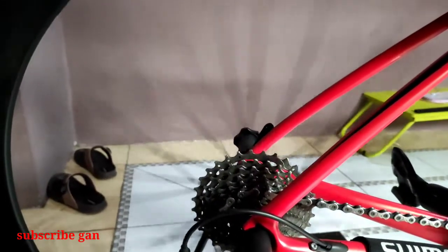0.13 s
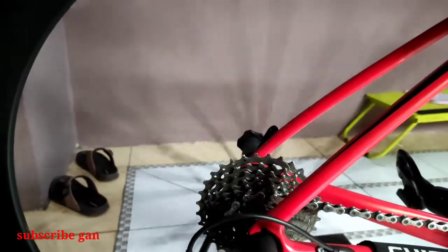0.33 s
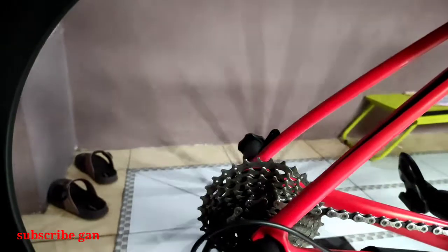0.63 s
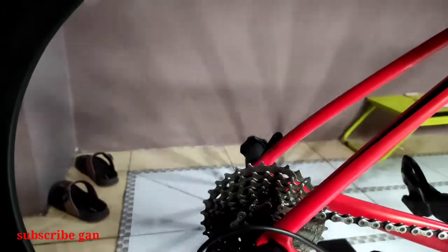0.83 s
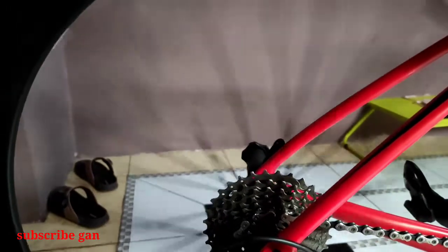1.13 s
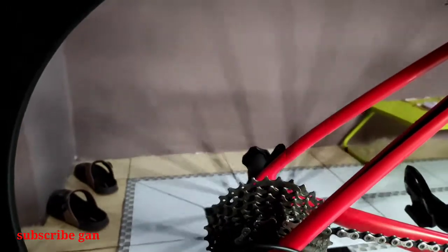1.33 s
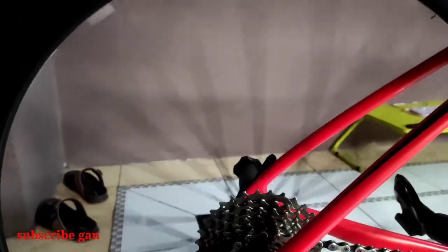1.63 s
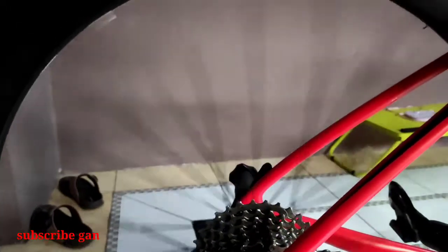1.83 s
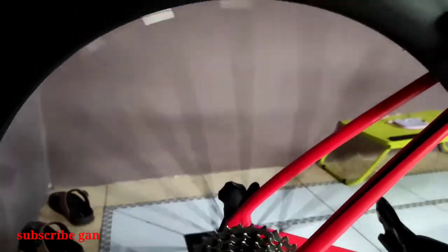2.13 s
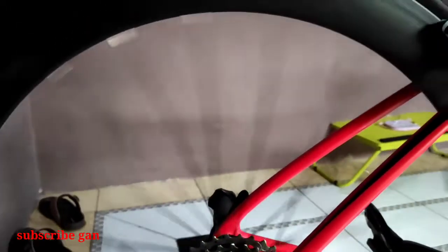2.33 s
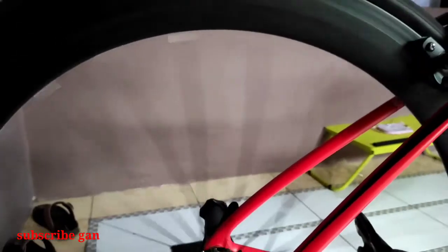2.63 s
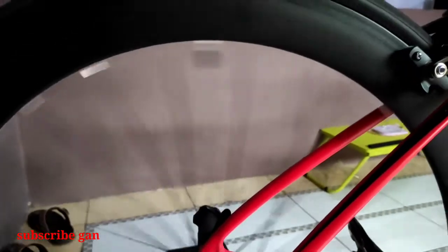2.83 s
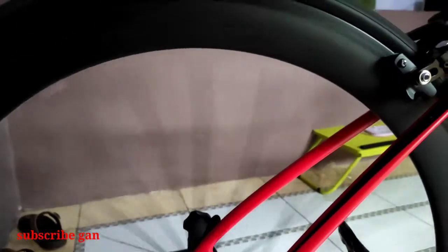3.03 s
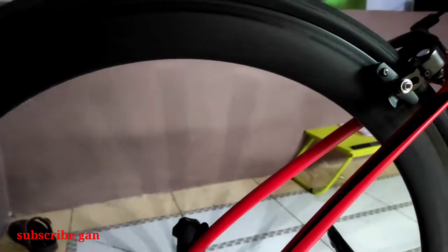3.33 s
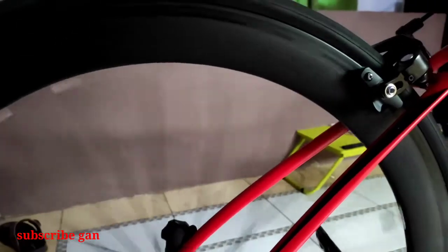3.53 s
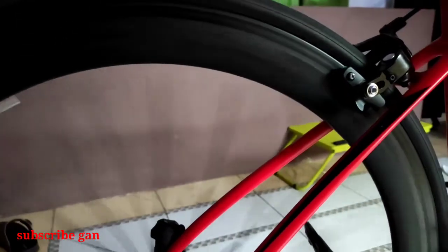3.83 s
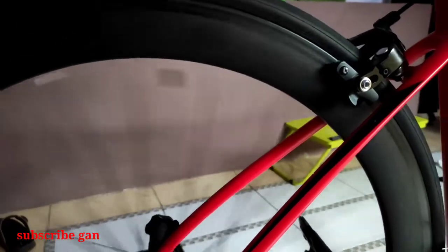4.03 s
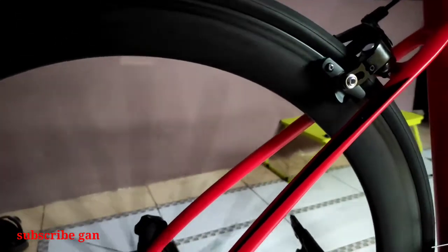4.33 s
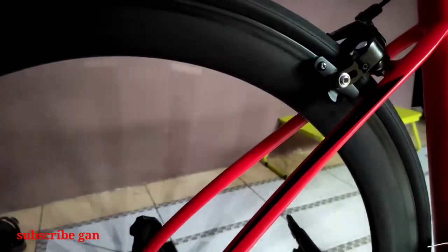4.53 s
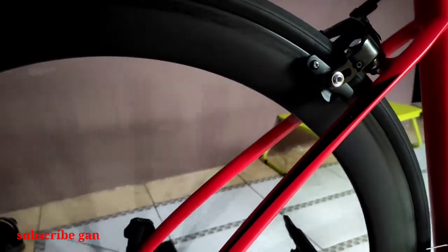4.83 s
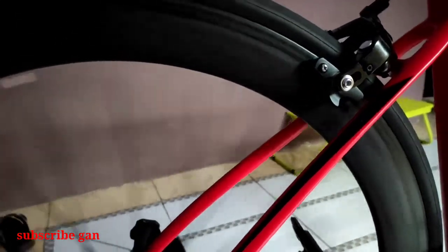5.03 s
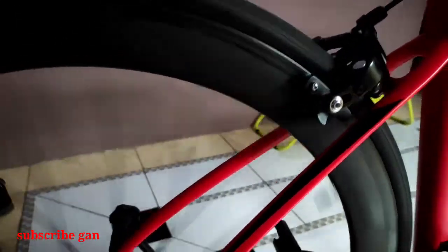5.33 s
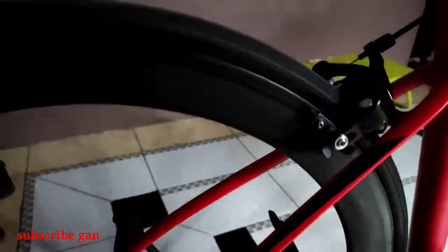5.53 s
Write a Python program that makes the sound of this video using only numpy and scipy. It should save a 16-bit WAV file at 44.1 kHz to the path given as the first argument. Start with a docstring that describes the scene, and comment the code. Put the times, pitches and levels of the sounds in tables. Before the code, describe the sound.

Close, rapid steel ratcheting from a freewheeling bicycle hub rattles on without pause, with faint engine drone and street murmur outside.

```python
"""A bicycle's rear wheel coasts in a small tiled room, slowly losing speed.
All along, the freehub's pawls snap over 24 teeth a turn and ring hub, sprockets, rim and spokes; walls answer.
Two microphones close to the wheel hear different sides of the hub and move between hub and rim.
Outdoors an engine drones faintly over a dull street murmur: its pitch sinks, then jumps up after 3.4 s.
Near 4.9 s a thin, faint tone swells and fades far off."""
import sys
import numpy as np
from scipy import signal
from scipy.fft import rfft, irfft
from scipy.io import wavfile
from scipy.ndimage import uniform_filter1d, map_coordinates

SR = 44100
rng = np.random.default_rng(int(sys.argv[2]) if len(sys.argv) > 2 else 0)


def master(y):
    """Save y as 16-bit WAV."""
    cut = np.clip(np.atleast_2d(y).T, -1, 1)
    pcm = np.round(cut * 32767)  # scale
    wavfile.write(sys.argv[1], SR, pcm.astype(np.int16))


N = 250091  # length in samples

TEETH, SNAPS = 24, 231  # teeth a turn, snaps in all
SCATTER_T60_S, SCATTER_DB = .063, 1.4  # cloud of echoes off wheel, frame and floor
CUTOFF_HZ = 15550  # top of the sound

# Contacts at each tooth: two slips off its edge, three pawls and three dying rebounds.
# Each row: lag in s, sway once a turn in s, relative strength in dB.
PAWLS = [(-.002, 0.00044, -18), (-.0006, 0.00015, -8.5), (0, 0.00046, -8), (.0006, 0.00035, -8.5),
         (.0013, 0.00011, -12.5), (.0023, 0.000069, -11), (.0052, 0.00044, -10.5), (.0082, 0.00017, -21)]


def freehub(colour_db):
    """The pawls ring the hub, and through it the rim and spokes; returns that ringing and the dry crack."""
    # The microphones move between hub and rim. Each row: time in s, place (-1 hub, 0 halfway, 1 rim,
    # and beyond), level of hub and crack in dB.
    microphone_path = [(0, -4, 1.66), (1.2, 1, 0), (1.85, -1.2, 0.8), (3.1, 2, 0.1), (4.35, 0, 0.95),
                       (4.7, 1.3, 0.5), (5.67, 0, 1.5)]
    crack_db = -33.5  # before the level along the path
    at, strength, angle = pawl_contacts(jitter_s=.00015, tooth_jitter_s=.00016, rebound_jitter=.14, uneven_db=.3)
    scatter = scatter_envelope(at, strength)
    starts = at.min(axis=1)
    place, level_db = in_time(microphone_path)
    hub = sprockets(at, strength, vary_db=2) + hub_shell(at, strength, scatter, starts, place, colour_db)
    wheel = rim_and_spokes(at, strength, scatter, starts, place, angle)
    crack = dry_crack(at, strength, starts, colour_db=2, count=10)
    return hub * from_db(level_db) + wheel, crack * from_db(crack_db + level_db)


def pawl_contacts(jitter_s, tooth_jitter_s, rebound_jitter, uneven_db):
    """Sample and strength of each contact (snaps x contacts), and the wheel's angle in turns at every sample."""
    # The coasting wheel. Each row: turns made, time in s.
    coasting = [(0, .0072), (2.5, 1.4366), (5, 2.8986), (7.5, 4.395), (9.5, 5.6183)]
    # Snaps that stand out of the buzz, hard, crisp or slack. Each row: time in s, force in dB against
    # the usual snap, lags as a share of the usual ones.
    accents = [(0.0316, -1.8, 1.0), (0.196, 1.7, 1.1), (0.2199, 3.5, 0.45), (0.3853, -1.8, 1.1),
               (0.4807, 1.8, 1.1), (0.5046, 1.6, 1.1), (0.6475, 1.4, 0.45), (0.6945, -1.8, 1.1),
               (0.7418, -3.7, 1.1), (0.8852, -2.3, 1.1), (0.9092, 2.8, 0.45), (1.029, 1.4, 0.7),
               (1.0773, 2.7, 0.45), (1.101, 3.9, 0.45), (1.1489, 1.3, 0.45), (1.1971, 2.7, 0.45),
               (1.2209, 2.8, 0.45), (1.3168, -3.7, 1.1), (1.3883, 2.0, 0.45), (1.4368, 2.7, 0.45),
               (1.5334, -2.9, 1.1), (1.5574, -3.1, 1.0), (1.582, -2.0, 1.1), (1.6545, 2.6, 0.6),
               (1.6788, 2.3, 0.5), (1.7273, 2.5, 0.4), (1.7515, 1.3, 0.4), (1.8241, -3.6, 0.9),
               (1.8481, -2.3, 1.1), (1.8717, -1.7, 1.1), (1.8961, -2.5, 1.1), (1.9452, 1.2, 0.5),
               (1.9694, 1.9, 0.8), (2.0177, 1.3, 0.45), (2.0661, 1.9, 0.45), (2.1152, -1.9, 1.1),
               (2.1884, 1.4, 1.0), (2.2618, 2.1, 0.45), (2.6285, 1.8, 0.45), (2.8501, 0.5, 0.45),
               (2.9979, -2.8, 1.1), (3.0227, -0.1, 0.4), (3.047, -2.7, 0.7), (3.1953, 1.8, 0.45),
               (3.2942, -2.5, 1.1), (3.3689, 1.5, 1.1), (3.4191, 3.3, 0.45), (3.4442, 2.5, 0.6),
               (3.4936, -1.7, 0.9), (3.6182, 0.9, 0.4), (3.6676, -0.4, 0.45), (3.8424, 1.6, 0.45),
               (4.0183, 1.9, 0.45), (4.1939, -2.7, 0.7), (4.6236, 1.8, 1.0), (4.649, 2.9, 0.45),
               (4.6995, 1.8, 1.1), (4.75, 2.0, 0.8), (5.0294, 1.4, 0.9), (5.2346, 2.4, 0.45),
               (5.5155, -1.9, 1.1), (5.5926, -2.2, 1.1)]
    turns = np.arange(SNAPS) / TEETH
    # a smooth polynomial through the rows gives the time of every tooth
    tooth_s = np.polyval(np.polyfit(*np.transpose(coasting), len(coasting) - 1), turns)
    lag, sway, strength_db = np.transpose(PAWLS)
    force_db = snap_force(turns) + uneven_db * rng.standard_normal(SNAPS)
    spread = np.ones(SNAPS)
    # the ratchet ring runs slightly off centre, so the pawls bunch and spread once a turn
    off_centre_s = sway * np.cos(2 * np.pi * turns)[:, None]
    drop_s = tooth_s[:, None] + off_centre_s + tooth_jitter_s * rng.standard_normal((SNAPS, 1))
    for accent_s, accent_db, share in accents:
        tooth = np.argmin(abs(tooth_s - accent_s))
        drop_s[tooth], force_db[tooth], spread[tooth] = accent_s, accent_db, share
    lags = lag * spread[:, None] * (1 + rebound_jitter * rng.standard_normal((SNAPS, len(lag))))
    contact_s = drop_s + lags + jitter_s * rng.standard_normal(lags.shape)
    at = np.clip(contact_s * SR, 0, N - 1).astype(int)
    strength = from_db(strength_db + force_db[:, None])
    return at, strength, np.interp(np.arange(N) / SR, tooth_s, turns)


def snap_force(turns):
    """Force of the snaps in dB: swells tied to the wheel's angle, settling turn by turn."""
    # Ratchet and bearings run out of true, so the snaps swell and ease as the wheel turns.
    # Each row: swells a turn, relative depth, wheel angle of a swell in turns.
    swells = [(1, 1.2, 0.8), (2, 0.44, 0.4), (2.36, 1, 0.48), (4, 2.2, 0.072), (6, 0.85, 0.029),
              (9, 2.5, 0.025)]
    start_db, settle_turns = .34, 10  # dB for a relative depth of 1 at the start, turns to 1/e
    swell = sum(depth * np.cos(2 * np.pi * per_turn * (turns - facing)) for per_turn, depth, facing in swells)
    return start_db * np.exp(-turns / settle_turns) * swell


def hub_shell(at, strength, scatter, starts, place, colour_db):
    """Steel modes of hub shell and cassette ring at every contact, shifting from snap to snap."""
    # Each row: middle in Hz, width of each of two resonances in Hz, left and right rms level in dB
    # before the level along the microphones' path.
    hub_modes = [(2167, 400, -54, -50), (2840, 480, -40, -40), (3400, 510, -45, -49.5),
                 (4017, 650, -37, -36), (5450, 390, -50.5, -45.5), (7220, 1400, -36.5, -34.5),
                 (7790, 570, -29.5, -25), (8705, 550, -25, -29), (9350, 760, -30.5, -39.5),
                 (10700, 1600, -46.5, -48.5), (12430, 610, -35.5, -35.5), (14300, 770, -41.5, -40),
                 (15500, 410, -51, -50)]
    wander = .27  # rms shift of a mode, about this share of its width
    out = 0
    for hz, width_hz, left_db, right_db in hub_modes:
        # no two teeth are struck alike, so the pitch and mix of the modes change
        snap_hz = hz + wander * width_hz * np.sqrt(3) * rng.uniform(-1.075, 1, SNAPS)
        driven = strikes(at, strength, scatter, vary_db=2.5)
        ring = sprung(resonate(driven, snap_hz, width_hz, starts), starts, strength)
        mix_db = colour_db * tooth_to_tooth(starts) + place * near_rim_db(hz)
        out = out + from_db([[left_db], [right_db]]) * rms_one(ring * from_db(mix_db))
    return out


def sprockets(at, strength, vary_db):
    """Short metallic pings: the hardest contact of each snap rings the cassette, at new pitches every time."""
    # Clusters of close modes; each snap rings one in each cluster at each microphone. Each row: middle
    # in Hz, half range in Hz, left and right rms level in dB before the level along the path.
    clusters = [(2844, 311, -44.5, -49.5), (4042, 272, -44, -42), (7680, 427, -45, -37.5),
                (8750, 455, -33, -45.5), (12530, 530, -52.5, -49)]
    t60_s = .035
    t = np.arange(SR // 12) / SR
    hardest = np.argmax(np.array(PAWLS)[:, 2])
    fade = from_db(-60 * t / t60_s)
    out = 0
    for hz, range_hz, left_db, right_db in clusters:
        pitches = hz + range_hz * (2 * rng.random((SNAPS, 2, 1)) - 1)
        sizes = strength[:, hardest, None, None] * from_db(vary_db * rng.standard_normal((SNAPS, 2, 1)))
        pings = np.zeros((2, N + len(t)))
        for start, pitch, size in zip(at[:, hardest], pitches, sizes):
            pings[:, start:start + len(t)] += size * fade * np.sin(2 * np.pi * pitch * t)
        out = out + from_db([[left_db], [right_db]]) * rms_one(pings[:, :N])
    return out


def rim_and_spokes(at, strength, scatter, starts, place, angle):
    """Lower modes of rim and spokes sing along, swelling and easing once a turn."""
    # Each row: middle in Hz, width of each of two resonances in Hz, level in dB before swell and place,
    # swell once a turn in dB (a dip where negative), wheel angle of the swell in turns.
    wheel_modes = [(760, 180, -69, 10.5, 0.72), (912, 180, -53.5, -0.5, 0.2), (1051, 50, -65, 5, 0.79),
                   (1203, 460, -61, -3, 0.42), (1523, 58, -63, 11, 0.3), (1667, 190, -59.5, 0.5, 0.44),
                   (1975, 91, -56, 4, 0.1)]
    out = 0
    for hz, width_hz, mode_db, swell_db, facing in wheel_modes:
        driven = strikes(at, strength, scatter, vary_db=1)
        ring = sprung(resonate(driven, np.full(SNAPS, hz), width_hz, starts), starts, strength)
        # each mode's lobes turn with the wheel and sweep past the microphones
        lobe_db = swell_db * np.cos(2 * np.pi * (angle - facing))
        out = out + from_db(mode_db + lobe_db + place * near_rim_db(hz)) * rms_one(ring)
    return out


def dry_crack(at, strength, starts, colour_db, count):
    """Steel on steel: noise bursts and echoes in `count` bands whose strengths differ by tooth; rms 1."""
    # Each row: frequency in Hz, relative density in dB per Hz.
    crack_spectrum = [(700, -49), (2000, 7), (3300, 1), (5000, 5.5), (6100, -10), (11000, 5.5),
                      (15500, -2.5)]
    t60_s, echo_db = .012, -1
    echo_energy = from_db(echo_db) ** 2 * trail(at, strength, SCATTER_T60_S)
    burst = np.sqrt(trail(at, strength, t60_s) + echo_energy)
    edges = np.linspace(crack_spectrum[0][0], CUTOFF_HZ, count + 1)
    out = 0
    for band in zip(edges, edges[1:]):
        noise = burst * from_db(colour_db * tooth_to_tooth(starts)) * rng.standard_normal((2, N))
        out = out + signal.sosfilt(signal.butter(2, band, "band", fs=SR, output="sos"), noise)
    return rms_one(coloured(out, crack_spectrum))


def scatter_envelope(at, strength):
    """Each snap trails off in the pawl's brief chatter and a longer cloud of echoes."""
    chatter_t60_s, chatter_db = .0093, 5.5
    chatter = from_db(chatter_db) ** 2 * trail(at, strength, chatter_t60_s)
    cloud = from_db(SCATTER_DB) ** 2 * trail(at, strength, SCATTER_T60_S)
    return np.sqrt(chatter + cloud)


def strikes(at, strength, scatter, vary_db):
    """What drives one mode at each microphone: every contact with a strength of its own, and its echoes."""
    echoes_per_s = 2000
    sizes = strength * from_db(vary_db * rng.standard_normal((2,) + at.shape))
    clicks = np.array([np.bincount(at.ravel(), side.ravel(), N) for side in sizes])
    echoes = rms_one((rng.random((2, N)) < echoes_per_s / SR) * rng.choice([-1, 1], (2, N)))
    return clicks + scatter * echoes


def resonate(x, snap_hz, width_hz, starts):
    """Two like resonances in a row, tuned anew at each snap: the ring swells briefly, then dies."""
    r = np.exp(-np.pi * width_hz / SR)
    g = (1 - r * r) / 2
    zeros = [g * g, 0, -2 * g * g, 0, g * g]
    state, out = np.zeros((2, 4)), []
    for hz, piece in zip(snap_hz, np.split(x + 1e-18, starts[1:], axis=1)):
        poles = [1, -2 * r * np.cos(2 * np.pi * hz / SR), r * r]
        # the state carries the old ring over into the new tuning
        ring, state = signal.lfilter(zeros, np.convolve(poles, poles), piece, zi=state)
        out.append(ring)
    return np.concatenate(out, axis=1)


def sprung(x, starts, strength):
    """However its contacts add up, a snap gives off about the energy that the springs held."""
    excess = np.add.reduceat((x ** 2).sum(axis=0), starts) / (strength ** 2).sum(axis=1)
    return x * by_snap(np.clip(excess / excess.mean(), .3, 3) ** -.5, starts)


def trail(at, strength, t60):
    """The energy of the contacts, spread over a dying tail."""
    keep = from_db(-60 / (t60 * SR)) ** 2
    energy = np.bincount(at.ravel(), strength.ravel() ** 2, N)
    return signal.lfilter([0, 1 - keep], [1, -keep], energy + 1e-18)


def tooth_to_tooth(starts):
    """Bounded chance of spread 1 for each snap; a strong one tends to follow a weak one."""
    return by_snap(np.diff(rng.random(SNAPS + 1)) * np.sqrt(6), starts)


def by_snap(values, starts):
    """Hold one value for the length of each snap, with soft steps."""
    return uniform_filter1d(np.repeat(values, np.diff(np.r_[0, starts[1:], N])), size=32)


def near_rim_db(hz):
    """How much a mode gains at each microphone on the way to the rim, in dB per unit of place."""
    # Change from halfway to the rim. Each row: frequency in Hz, left and right gain in dB.
    rim_gain = [(750, -5, -1), (1090, 2, 2), (1460, 1, 0), (2270, 4, 2.5), (2760, 2.5, -0.6),
                (4000, 0, -0.5), (8300, 0.5, 0)]
    return np.array([[at_hz(np.array(rim_gain)[:, [0, side]], hz)] for side in (1, 2)])


def room(x, build_s, count):
    """Hard walls return a diffuse tail; it changes as the hand-held microphones pass `count` places."""
    # The room's ring against the sound that feeds it. Each row: frequency in Hz, gain in dB.
    room_colour = [(700, 2), (2000, 3.5), (4000, 0.5), (6000, -2), (8500, -5), (15000, -7)]
    t60_s = .3
    t = np.arange(SR // 3) / SR
    shape = from_db(-60 * t / t60_s) * (1 - np.exp(-t / build_s))
    out = np.zeros((2, N + len(t)))
    path = np.linspace(0, count - 1, N)
    for place in range(count):
        near = np.flatnonzero(abs(path - place) < 1)
        crossfade = np.sqrt(1 - abs(path[near] - place))
        diffuse = rms_one(rng.standard_normal((2, len(t))) * shape) / np.sqrt(len(t))
        wet = signal.fftconvolve(x[:, near] * crossfade, coloured(diffuse, room_colour), axes=1)
        out[:, near[0]:near[0] + wet.shape[1]] += wet
    return out[:, :N]


def engine(waver, flutter_db):
    """Only the lowest harmonics of the firing come through the walls, with the rush of the exhaust."""
    # It runs down, then picks up again. Each row: time in s, firing rate in Hz, levels of the second,
    # third and fourth harmonic in dB before flutter and the lean to the left.
    firing = [(0, 80.7, -64, -48, -82), (.2, 81.4, -49, -56, -56), (.5, 78.3, -47, -67, -68),
              (.58, 79.8, -59, -62, -68), (.67, 76.7, -46.5, -48, -68), (.78, 77.8, -60, -68, -51),
              (.88, 77.3, -54, -49, -60), (1, 76.6, -59, -46.5, -73), (1.12, 76.2, -49.5, -43.5, -68),
              (1.25, 76.2, -55.5, -63.5, -72), (1.6, 74.2, -54, -55, -68), (1.75, 72.2, -66, -61, -58),
              (2, 71.1, -68, -64, -72), (2.33, 68.4, -67, -56, -68), (2.55, 66.9, -60, -66, -58),
              (2.72, 65.1, -61, -67, -70), (2.85, 64.25, -65, -65, -57), (3.2, 62.7, -73, -70, -60),
              (3.4, 62.2, -73, -78, -72), (3.6, 78, -70, -76, -73), (4, 77.8, -85, -95, -83),
              (4.2, 78.4, -58, -82, -65), (4.55, 79.4, -52.5, -82, -65), (4.8, 78.1, -65, -77, -85),
              (5.67, 78, -66, -67, -74)]
    # Exhaust noise. Each row: frequency in Hz, relative density in dB per Hz.
    exhaust_spectrum = [(100, -10), (180, -12), (280, -1.5), (370, -3), (480, -22), (650, -21), (1000, -11)]
    # Each row: time in s, exhaust level in dB before the lean to the left.
    exhaust_level = [(0, -38), (1.2, -41.5), (2.2, -45), (2.9, -41), (3.5, -85), (5.67, -65)]
    first_db = -14  # the firing rate itself against its second harmonic
    hz, *harmonics_db = in_time(firing)
    phase = 2 * np.pi * np.cumsum(hz * (1 + waver * drift(24))) / SR
    drone = 0
    for k, db in enumerate([harmonics_db[0] + first_db] + harmonics_db, 1):
        drone = drone + from_db(db + flutter_db * drift(12)) * np.sqrt(2) * np.sin(k * phase)
    return drone + from_db(in_time(exhaust_level)[0]) * outdoor_noise(exhaust_spectrum)


def whine(waver):
    """A thin tone far off, a wavering sine, swells and fades."""
    middle_s, half_s, hz = 4.86, .19, 723  # half_s: from the middle to 1/e
    peak_db = -60  # before the lean to the left
    swell = np.exp(-((np.arange(N) / SR - middle_s) / half_s) ** 2)
    phase = 2 * np.pi * np.cumsum(hz * (1 + waver * drift(25))) / SR
    return from_db(peak_db) * swell * np.sqrt(2) * np.sin(phase)


def street():
    """Steady murmur of the street: dull noise, strongest in the bass."""
    # Each row: frequency in Hz, relative density in dB per Hz.
    street_spectrum = [(12, -12), (28, 0.5), (50, -4), (65, -4), (85, 0.9), (113, -8), (160, -3), (260, -4),
                       (450, -11), (700, -12), (1200, -30)]
    return from_db(-54.5) * outdoor_noise(street_spectrum)  # dB before the lean to the left


def outdoor_noise(spectrum):
    """Coloured noise of rms 1, alike on both sides but for a looser stretch around 300 Hz."""
    # Likeness of the sides. Each row: frequency in Hz, correlation from 0 to 1.
    likeness = [(30, 1), (150, 1), (300, 0.65), (700, 1)]
    mid, side = rfft(coloured(rng.standard_normal((2, N)), spectrum))
    alike = np.clip(at_hz(likeness, np.fft.rfftfreq(N, 1 / SR)), 0, 1)
    return rms_one(irfft(np.sqrt(1 + alike) * mid + np.sqrt(1 - alike) * side * [[1], [-1]], N))


def from_db(db):
    """Decibels to gain."""
    return 10 ** (np.asarray(db) / 20)


def rms_one(x):
    """Scale each channel to an rms of 1."""
    return x / np.sqrt(np.mean(x ** 2, axis=-1, keepdims=True) + 1e-20)


def in_time(rows):
    """The columns of a curve at every sample."""
    s, *columns = np.transpose(rows)
    return [np.interp(np.arange(N) / SR, s, c) for c in columns]


def at_hz(points, hz):
    """Read a spectrum on a log-frequency axis."""
    f, value = np.transpose(points)
    return np.interp(np.log(hz + 1), np.log(f), value)


def coloured(x, spectrum):
    """Filter a sound by a smooth spectrum in dB."""
    size = x.shape[-1]
    gain = from_db(at_hz(spectrum, np.fft.rfftfreq(size, 1 / SR)))
    return irfft(rfft(x) * gain, size)


def drift(rate):
    """Slow chance of spread about 1, with `rate` new values a second."""
    values = rng.standard_normal(1024)
    return map_coordinates(values, [np.arange(N) / SR * rate], order=2, mode="wrap")


def scene():
    """The bicycle in its room, with the outdoors leaning to the left."""
    ringing, crack = freehub(colour_db=1.2)
    outdoors = engine(waver=.008, flutter_db=2.5) + street() + whine(waver=.00418)
    lean = from_db([[1.8], [-2.2]])
    return ringing + crack + room(ringing, build_s=.0015, count=24) + outdoors * lean


def record(dry):
    """Peaks beyond full scale are clipped, then the top is cut."""
    top_cut = signal.ellip(12, .1, 80, CUTOFF_HZ, fs=SR, output="sos")
    return signal.sosfilt(top_cut, np.clip(dry, -1, 1))


dry = scene()
out = record(dry)
master(out)
```